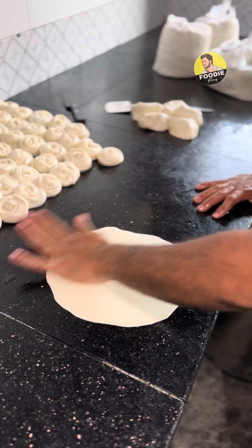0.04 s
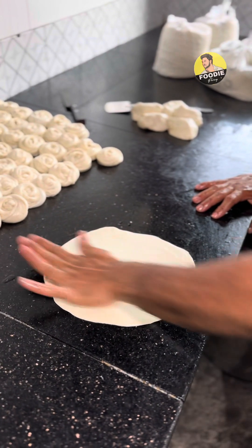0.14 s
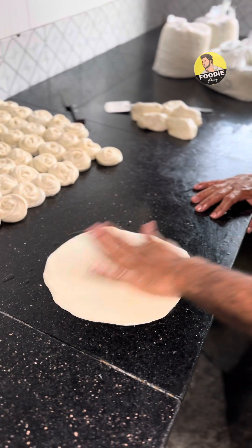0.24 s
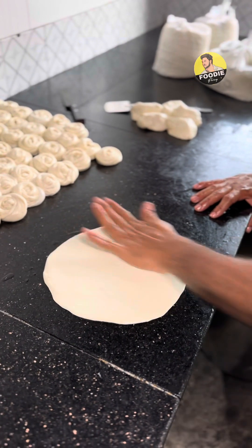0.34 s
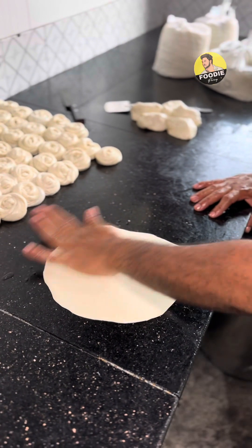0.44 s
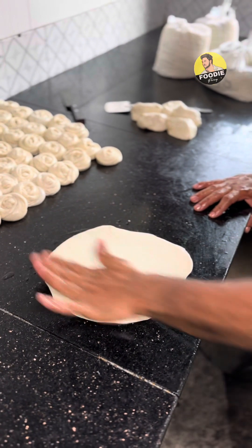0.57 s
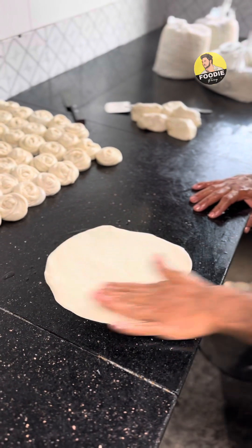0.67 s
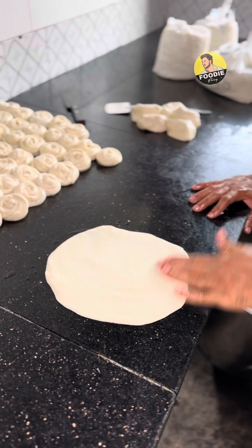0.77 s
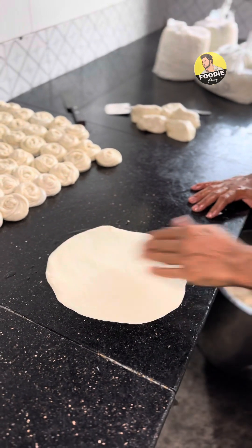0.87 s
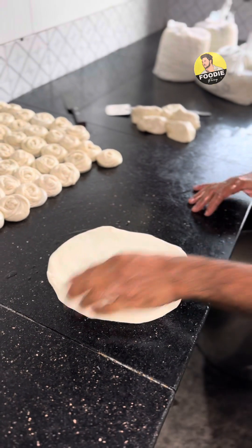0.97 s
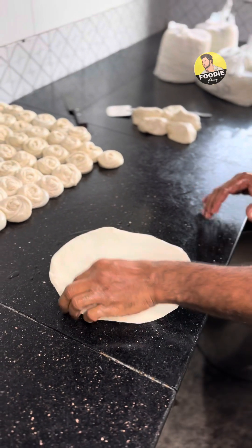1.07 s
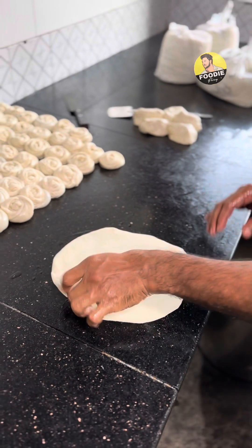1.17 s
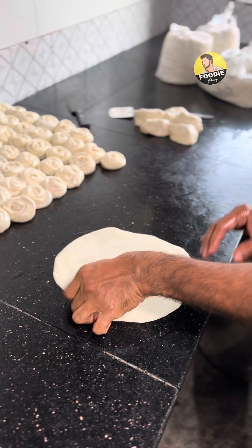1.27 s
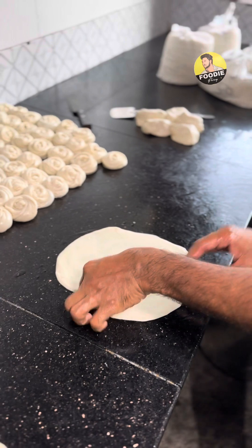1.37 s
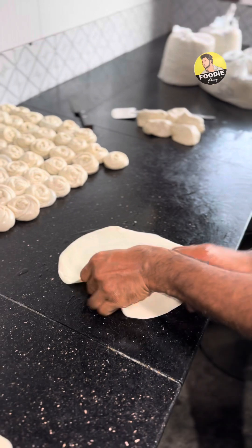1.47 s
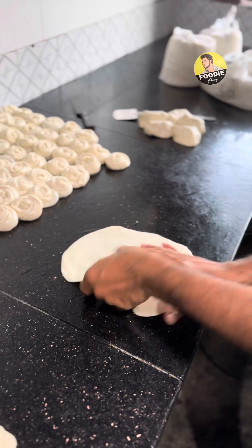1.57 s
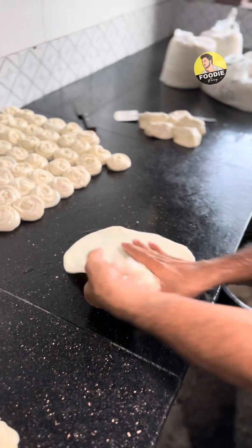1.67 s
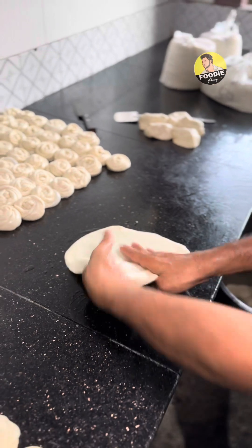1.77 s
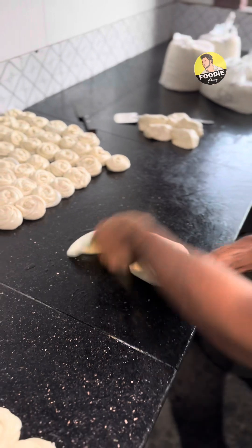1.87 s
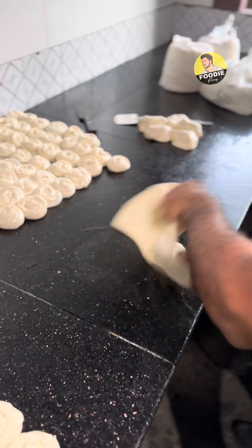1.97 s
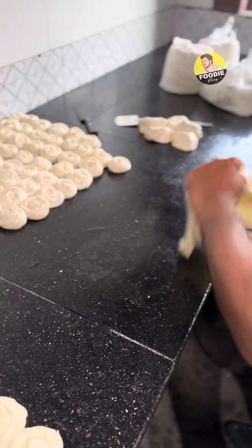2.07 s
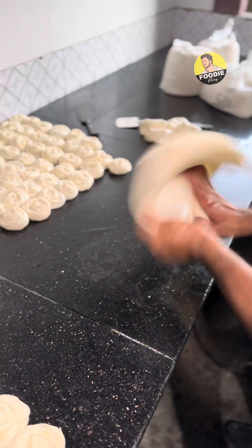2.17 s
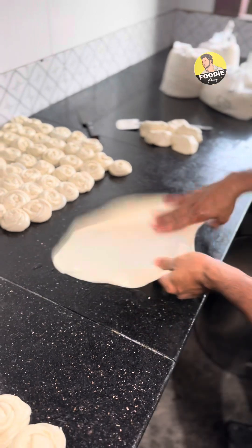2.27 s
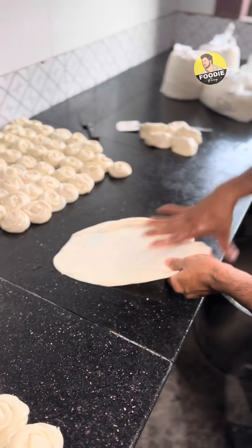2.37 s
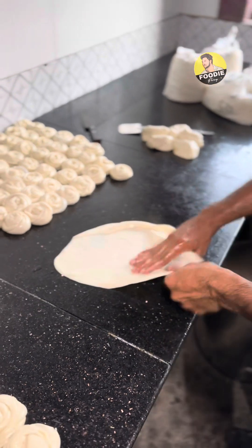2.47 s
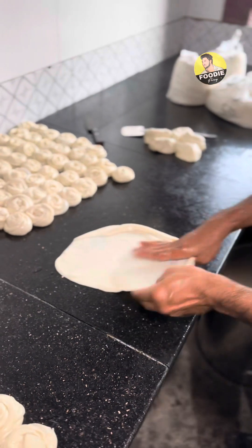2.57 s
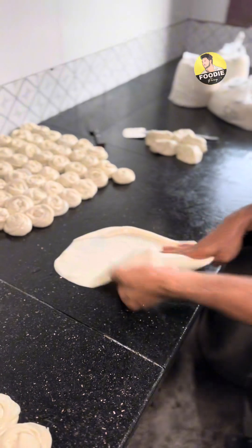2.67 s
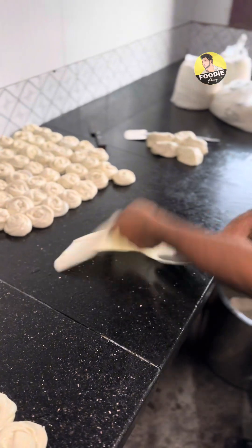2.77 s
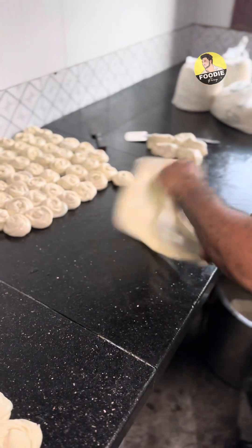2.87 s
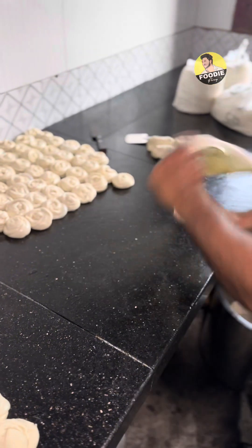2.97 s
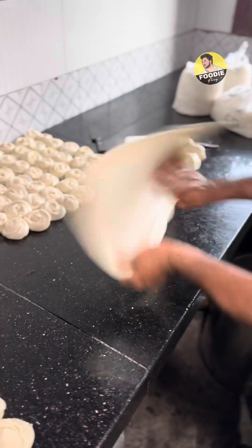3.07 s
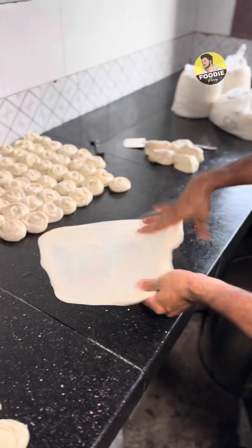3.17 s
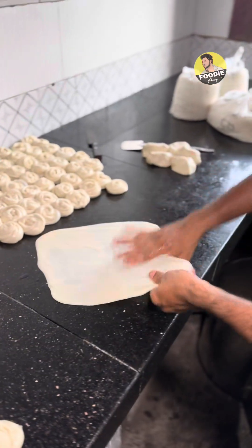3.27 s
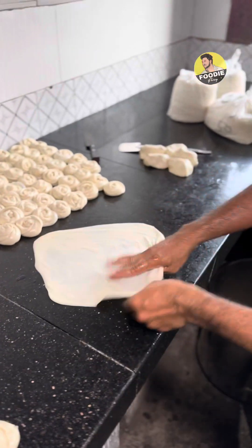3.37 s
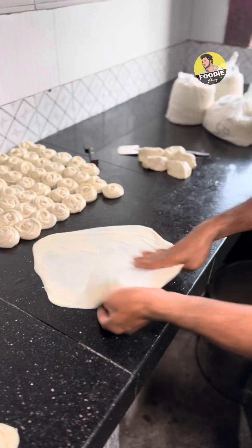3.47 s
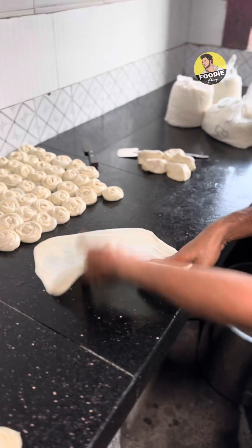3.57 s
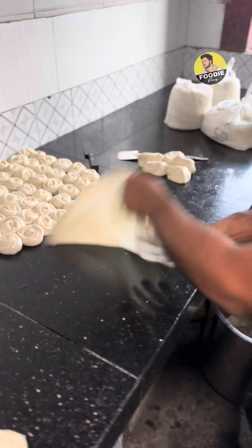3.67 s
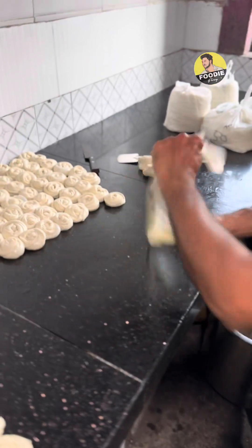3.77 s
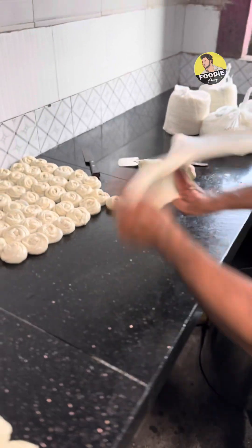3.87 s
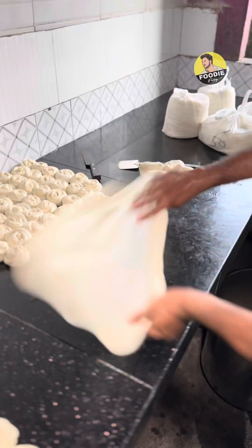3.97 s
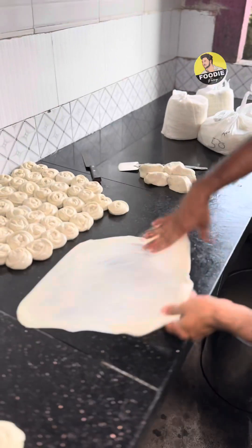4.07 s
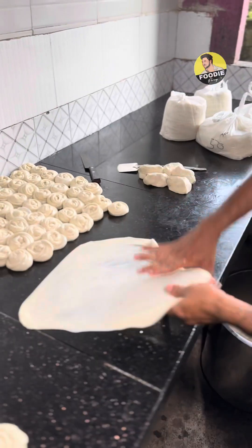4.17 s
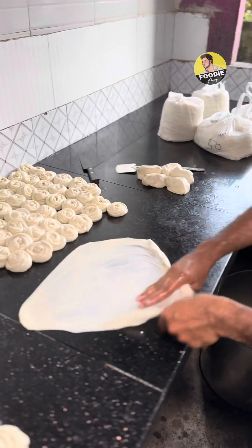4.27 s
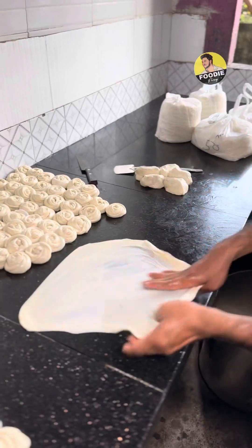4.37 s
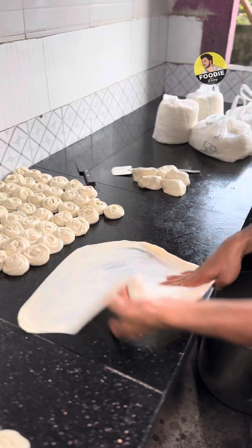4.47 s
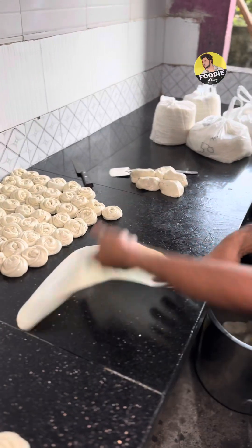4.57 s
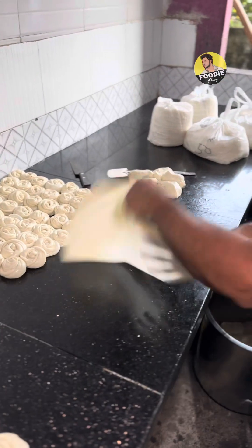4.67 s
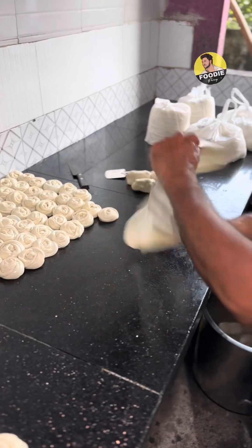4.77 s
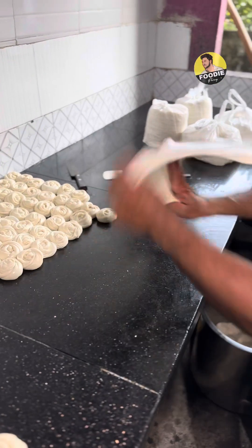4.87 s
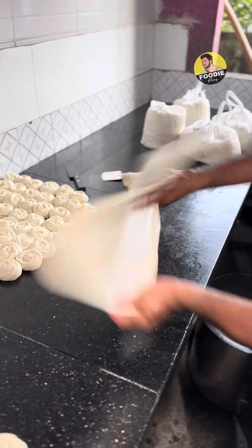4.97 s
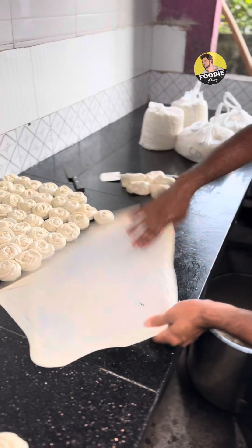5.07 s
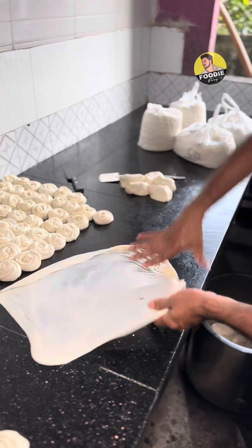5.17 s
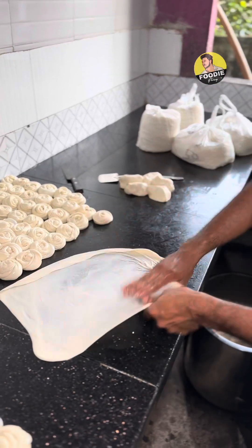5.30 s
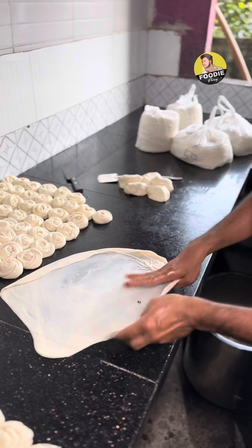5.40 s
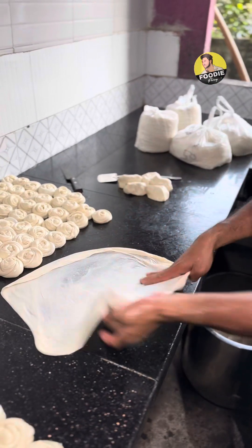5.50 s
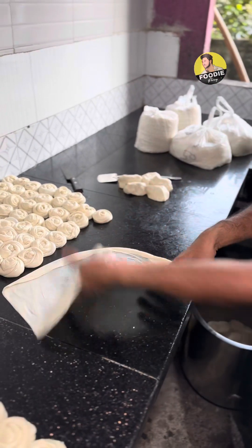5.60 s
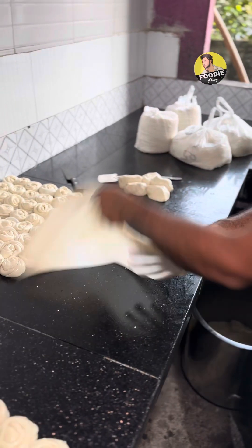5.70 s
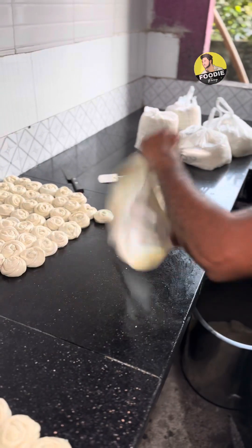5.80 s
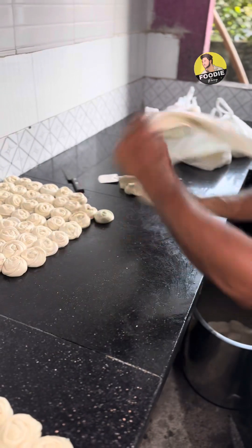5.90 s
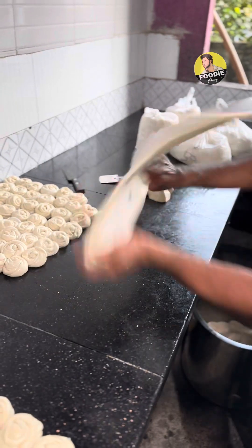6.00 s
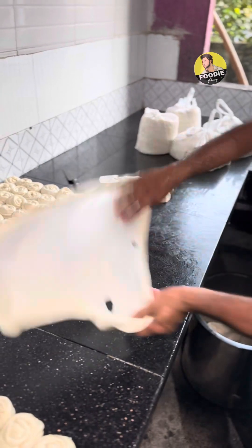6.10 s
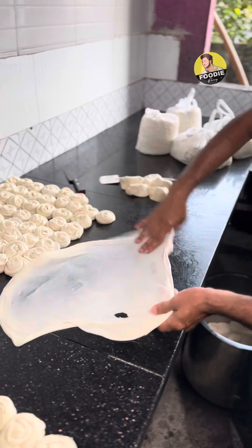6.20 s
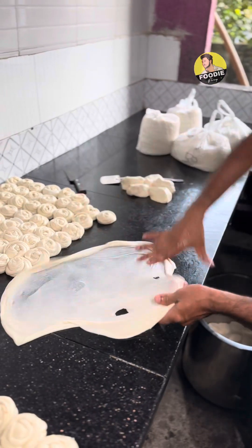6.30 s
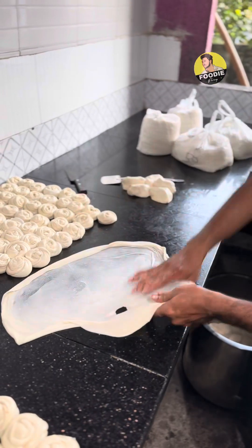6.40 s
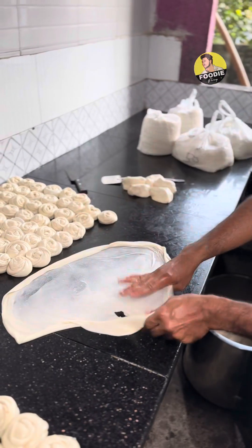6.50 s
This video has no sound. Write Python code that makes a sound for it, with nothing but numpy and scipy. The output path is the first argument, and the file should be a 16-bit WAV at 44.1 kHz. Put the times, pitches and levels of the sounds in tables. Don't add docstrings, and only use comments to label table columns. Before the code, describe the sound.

Thin dough sheets slap hard onto a stone counter at about one-second intervals, over a steady low fan and street hum in a tiled kitchen.

```python
import sys
import numpy as np
from scipy import signal
from scipy.fft import rfft, irfft
from scipy.io import wavfile
from scipy.ndimage import uniform_filter1d

SR = 44100
rng = np.random.default_rng(int(sys.argv[2]) if len(sys.argv) > 2 else 0)


def ratio(d):
    e = np.asarray(d, float) / 20
    return 10 ** e


def dump_mix(stems):
    frames = np.atleast_2d(stems).T
    limited = np.clip(frames, -1, 1)
    pcm = np.round(limited * 32767).astype(np.int16)
    wavfile.write(sys.argv[1], SR, pcm)


N = 288678
TIME = np.arange(N) / SR
FREQ = np.fft.rfftfreq(N, 1 / SR)

# time in seconds, level in dB.
STREET_SWELL = [(0.0, -36.5), (0.11, -40), (0.46, -42), (1.29, -42.5), (1.51, -38), (2.11, -40.5),
                (2.83, -41.5), (3.04, -44), (3.7, -49), (4.05, -43), (5.56, -45), (5.82, -44),
                (6.45, -42.5), (6.55, -43)]
STREET_MEAN_DB = -42.5
FOLLOW_STREET = (0.56, 0.035, 0.25, 0.0)
# centre in seconds, half width in seconds, lift in dB.
GUSTS = [(.2, 0.55, 10), (.85, .07, 10), (1.8, 0.42, 13), (2.8, 0.27, 8), (3.62, 0.18, 15), (4.1, 0.13, 5),
         (4.75, 0.37, 14), (5.62, 0.17, 11), (6.05, .2, 9)]
CALM_DB = -22.5
# frequency in Hz,
# density in dB per Hz.
HUM_MID = [(25, -15), (70, -2), (154, -11.5), (280, -15), (510, -26.5), (651, -24.5), (1780, -32),
           (2670, -31.5), (4300, -37), (5000, -43), (5800, -37.5), (9580, -45), (10300, -51),
           (13600, -68), (14700, -37), (15800, -43), (16100, -87)]
# frequency in Hz, density in dB per Hz.
HUM_SIDE = [(15, -50), (25, -23), (121, -14.5), (163, -21), (280, -6), (313, -9.5), (726, -2),
            (1830, -13.5), (2750, -4), (4480, -9), (5880, -23), (10700, -11), (14800, -6.5), (16500, -36)]
# centre in Hz, width in Hz, level in dB.
DRONES = [(67.7, 14.4, -46), (113.2, 8.7, -55.5), (211.2, 15, -50)]
# start in seconds, peak in dB, ring in Hz, ring T60 in seconds,
# click over ring in dB.
TAPS = [
    (0.331, -42, 2930, 0.038, -23),
    (0.52, -40, 770, 0.029, 0),
    (2.429, -45, 2600, 0.053, -2),
    (2.696, -42, 845, 0.046, -10),
    (3.557, -24.5, 860, 0.017, -8),
    (4.506, -35, 1040, 0.024, -6.5),
    (4.966, -30.5, 1510, 0.045, -6.5),
    (5.573, -39, 900, 0.043, -15),
    (5.661, -45, 900, 0.036, 9),
    (6.039, -27, 1450, 0.031, -12),
]
# start in seconds, peak in dB, ring in Hz,
# ring T60 in seconds, click over ring in dB.
SWISHES = [
    (3.104, -29, 2750, .09, -14),
    (3.115, -25, 2700, .05, -14),
    (3.982, -36, 2400, .05, -14),
    (6.209, -36, 2600, .04, 2),
    (6.227, -37, 1800, .04, 2),
]
# start in seconds, length in seconds, from Hz, to Hz, level in dB.
SQUEALS = [
    (.5, .25, 2620, 2620, -63),
    (4.3, .42, 2380, 2480, -60),
    (5.4, .67, 2770, 2860, -56.5),
    (6.2, .35, 2600, 2590, -62),
    (6.25, .3, 2330, 2330, -63),
]
# start in seconds, length in seconds, top pitch in Hz, level in dB,
# strong-weak pulsing from 0 to 1.
CAWS = [
    (2.122, .285, 562, -53, .083),
    (3.16, .28, 562, -54, .73),
]
# frequency in Hz, gain in dB.
THROAT = [(500, -28), (1050, -5), (1520, 2.5), (1700, -2), (1950, 5), (2260, 5), (2700, -17), (3300, -14)]
CAW_SAG, CAW_PEAK_AT, CAW_EDGE_S = .19, .25, .012
# start in seconds, peak in dB, pocket start in Hz, contact in ms, pitch fall in ms.
SLAPS = [
    (2.2372, -12.5, 2950, 2.68, 1.94),
    (3.1211, -9.5, 2623, 3.65, 2.6),
    (3.9913, -17.5, 2625, 2.87, 1.37),
    (4.0204, -28, 2970, 1, 20),
    (5.0149, -18.5, 1810, 3.5, 1.18),
    (5.0376, -8, 1475, 3.8, 2.44),
    (6.1122, -18, 1257, 5.4, 4.76),
]
CRACK_DB, CRACK_DB_PER_KHZ = -47.5, 14
RAGGED_DB, RAGGED_DB_PER_KHZ = -23, 8
# start in seconds, level in dB, centre in Hz.
THUMPS = [(2.244, -28.5, 302), (3.13, -19.5, 223), (3.994, -24.5, 193), (5.04, -28, 300),
          (6.115, -28.5, 366)]
# start in seconds, level in dB, fade in dB per second, dullness as
# 700-2200 Hz over the treble in dB.
FOLDS = [(2.25, -31, 230, -4.5), (3.128, -28, 900, -13), (3.136, -22.5, 450, 5.5), (3.165, -35, 192, 6.5),
         (3.24, -48.5, 28, 7), (3.997, -27, 800, -7), (4.017, -35.5, 240, -3), (5.045, -32.5, 330, 3),
         (5.085, -49, 120, -8), (6.118, -40, 106, 0), (6.158, -43, 300, -4), (6.18, -42.5, 400, -9),
         (6.202, -35.5, 400, -11), (6.222, -43, 550, -7)]
FOLD_ATTACK_S, FOLD_LASTS_S = 0.0024, 0.12
# centre in seconds, pitch in Hz, level in dB, half width in ms.
CHIRPS = [(3.083, 6500, -51, 25), (3.36, 7200, -51.5, 30), (3.41, 7570, -48.5, 22), (3.503, 6820, -52, 14),
          (3.557, 6700, -51, 12), (3.93, 8000, -52, 15), (2.88, 8000, -54, 15)]
# frequency in Hz, radians by which the left leads.
PORT_LEAD = [(0, 0), (300, -.1), (1980, -.3), (2500, -1.7), (4310, -2.0), (4800, -2.6), (5680, -.5),
             (7240, -.2), (8500, -1.3), (9900, -3.05), (13500, -3.14), (14800, -4.0), (17000, -4.2)]
# frequency in Hz, share from 0 to 1.
PORT_APART = [(250, 0), (600, .8), (3000, 1), (8000, .7), (9800, 0)]
# frequency in Hz, T60 in seconds.
ROOM_T60 = [(200, 0.81), (800, 0.23), (2500, 0.31), (6000, 0.26), (12000, 0.19)]
# delay in seconds, level in dB.
ECHOES = [(.0095, -17), (0.0125, -14.5), (.021, -25)]


def unit(x):
    return x / np.sqrt(np.mean(x ** 2))


def shape(table, hz):
    f, v = np.transpose(table)
    return np.interp(np.log(hz + 1), np.log(f + 1), v)


def band(x, lo_hz, hi_hz):
    return signal.sosfilt(signal.butter(2, [lo_hz, hi_hz], "bandpass", fs=SR, output="sos"), x)


def smooth(x, first, second):
    return uniform_filter1d(uniform_filter1d(x, first), second)


def walk(rate):
    k = int(SR / rate)
    held = np.repeat(rng.standard_normal(N // k + 1), k)
    return 1.32 * smooth(held, k, k)[:N]


def decay(t, t60):
    return np.exp(-np.log(1000) * t / t60)


def tone(hz):
    return np.sin(2 * np.pi * np.cumsum(hz) / SR)


def add(out, s, x):
    i = int(s * SR)
    out[i:i + len(x)] += x[:N - i]


def ports(left, other, direct=0):
    f, lead = np.transpose(PORT_LEAD)
    turn = np.exp(.5j * (np.interp(FREQ, f, lead) + direct * (FREQ > 9800)))
    share = shape(PORT_APART, FREQ)
    a, b = rfft(left), rfft(other)
    mixed = a + share * (b - a)
    return np.array([irfft(a * turn, N), irfft(mixed / turn, N)])


def traffic_db():
    return np.interp(TIME, *np.transpose(STREET_SWELL)) - STREET_MEAN_DB


def hum(side_db=-26):
    swells = np.outer(FOLLOW_STREET, traffic_db())
    swells[-1] += CALM_DB
    for s, width, db in GUSTS:
        swells[-1] += db * np.exp(-((TIME - s) / width) ** 2)
    air = rfft(rng.standard_normal(N))
    f, lead = np.transpose(PORT_LEAD)
    lag = 1j * np.sign(np.sin(np.interp(FREQ, f, lead)))
    mid = air * ratio(shape(HUM_MID, FREQ))
    side = lag * air * ratio(shape(HUM_SIDE, FREQ) + side_db)
    pair = np.array([mid + side, mid - side]) / np.std(irfft(mid, N))
    out = 0
    for octave in np.arange(4, 14.5, .5):
        window = np.clip(1 - 2 * np.abs(np.log2(FREQ + 1) - octave), 0, 1)
        layer = np.searchsorted([7.2, 12.2, 13.2], octave)
        flicker_db = (1.7, 1.66, 0.93, 0.68)[layer] * walk(9) + 0.29 * walk(2.37)
        flicker_db += 4.5 * (octave > 13.4) * walk(16)
        out = out + ratio(swells[layer] + flicker_db) * irfft(pair * window, N)
    return ratio(-37.0) * out


def drones():
    out, street_db = np.zeros((2, N)), traffic_db()
    for hz, width, db in DRONES:
        noise = unit(band(rng.standard_normal((2, N)), hz - width / 2, hz + width / 2))
        out += ratio(db + 1.6 * walk(6.8) + street_db * (hz < 100)) * noise
    return ports(*out)


def taps():
    out, t = np.zeros(N), TIME[:4096]
    for s, db, hz, t60, click_db in TAPS + SWISHES:
        noise = rng.standard_normal((2, len(t)))
        breath = unit(band(noise[0], 0.85 * hz, 1.64 * hz))
        ring = (1.36 * np.sin(2 * np.pi * hz * t) + 0.54 * breath) * decay(t, t60)
        click = unit(band(noise[1], 1250, 4900)) * np.exp(-t / 0.0059)
        attack = np.minimum(t / 0.0014, 1)
        add(out, s - .001, ratio(db) * attack * (ring + ratio(click_db) * click))
    return out


def squeals(waver=.008, flutter_db=1):
    out = np.zeros(N)
    for s, length, from_hz, to_hz, db in SQUEALS:
        u = np.clip((TIME - s) / length, 0, 1)
        hz = (from_hz + (to_hz - from_hz) * u) * (1 + waver * walk(120))
        swell = np.abs(np.sin(np.pi * u)) ** 0.3 * (u < 1)
        out += ratio(db + flutter_db * walk(14)) * (1.4 + 0.52 * walk(70)) * swell * tone(hz)
    return out


def crow(rough=0.016, rasp=.5):
    out = np.zeros(N)
    for s, length, top_hz, db, doubling in CAWS:
        u = np.clip((TIME - s) / length, 0, 1)
        scoop = np.clip(1 - u / CAW_PEAK_AT, 0, 1) ** 1.3
        droop = np.clip((u - CAW_PEAK_AT) / (1 - CAW_PEAK_AT), 0, 1) ** 2.6
        hz = top_hz * (1 - CAW_SAG * (scoop + droop))
        phase = 2 * np.pi * np.cumsum(hz * (1 + rough * walk(90))) / SR
        stack = 0
        for k in range(1, 7):
            stack = stack + ratio(shape(THROAT, k * hz) + 2.7 * walk(30.23)) * np.sin(k * phase)
        edges = np.minimum(np.minimum(u, 1 - u) * length / CAW_EDGE_S, 1)
        pulses = 1 + rasp * walk(150) + doubling * np.cos(phase / 2)
        out += ratio(db) * edges * stack * pulses
    return out


def slaps():
    out, t = np.zeros(N), TIME[:2048]
    for s, db, hz, contact_ms, fall_ms in SLAPS:
        noise = rng.standard_normal((4, len(t)))
        rise = t / (contact_ms * 4.5e-4)
        swell = rise * np.exp(1 - rise)
        pitch = 300 + (hz - 300) * np.exp(-t / (fall_ms * 1e-3))
        wobble = .6 * unit(smooth(noise[0], 12, 16))
        pocket = np.sin(2 * np.pi * np.cumsum(pitch) / SR + wobble) * swell ** 0.82
        ragged = swell * unit(band(noise[3], 1560, 3430))
        ragged *= ratio(RAGGED_DB + RAGGED_DB_PER_KHZ * hz / 1e3)
        crack = unit(band(noise[1], 5790, 6590)) + ratio(5.5) * unit(band(noise[2], 2100, 16200))
        crack *= swell * ratio(CRACK_DB + CRACK_DB_PER_KHZ * hz / 1e3)
        add(out, s, ratio(db) * (pocket + ragged + crack))
    return out


def thumps(t60=0.11):
    out, t = np.zeros(N), TIME[:8192]
    for s, db, hz in THUMPS:
        boom = unit(band(rng.standard_normal(len(t)), 0.52 * hz, 1.48 * hz))
        add(out, s, ratio(db) * np.minimum(t / 0.0011, 1) * decay(t, t60) * boom)
    return out


def settle(spread_db=0.4, rate=8000):
    power = np.zeros((2, N))
    for s, db, fade_db, dull_db in FOLDS:
        t = np.clip(TIME - s, 0, 1)
        fold = ratio(db - fade_db * t) * np.minimum(t / FOLD_ATTACK_S, 1)
        fold *= np.clip((FOLD_LASTS_S - t) / 0.036, 0, 1)
        power += (fold * np.array([[1], [ratio(dull_db)]])) ** 2
    gain = np.sqrt(power)
    happens = rng.random(N) < rate / SR
    pops = happens * rng.standard_normal(N) * ratio(spread_db * rng.exponential(size=N))
    sides = []
    for share in (0, .9):
        x = unit(pops) + share * rng.standard_normal(N)
        bright = unit(band(x, 1660, 5330))
        bright += ratio(-3.5) * unit(band(x, 6200, 10200))
        bright += ratio(-10.5) * unit(band(x, 9000, 14400))
        dull = unit(band(x, 705, 1060)) + ratio(-2) * unit(band(x, 1290, 2200))
        sides.append(ratio(5.0) * gain[0] * bright + gain[1] * dull)
    return ports(*sides)


def chirps():
    out = np.zeros(N)
    for s, hz, db, ms in CHIRPS:
        t = np.arange(-.08, .08, 1 / SR) / (ms * 1e-3)
        wobble = 0.95 * unit(uniform_filter1d(rng.standard_normal(len(t)), size=90))
        phase = 2 * np.pi * np.cumsum(hz * (1 - .012 * t)) / SR + wobble
        add(out, s - .08, ratio(db) * np.exp(-t ** 2) * np.sin(phase))
    return out


def room(x):
    t = TIME[:SR // 2]
    noise = rng.standard_normal((2, len(t)))
    noise[1] = 0.52 * noise[0] + 1.13 * noise[1]
    tail = 0
    for hz in 180 * 2. ** np.arange(7):
        octave = band(noise, hz / 2 ** .5, hz * 2 ** .5)
        tail = tail + min(hz / 700, 1) * octave * decay(t, shape(ROOM_T60, hz))
    tail = ratio(-30) * tail * np.minimum(t / 0.0007, 1)
    for delay, db in ECHOES:
        tail[:, int(delay * SR)] += ratio(db)
    return ports(*signal.fftconvolve(tail, x[None])[:, :N])


def scene():
    near = taps() + slaps() + thumps()
    outside = squeals() + crow() + chirps()
    direct = ports(near + outside, near + outside, direct=0.4)
    return direct + room(near + ratio(6.5) * outside) + settle() + hum() + drones()


def band_limit(x):
    return signal.sosfilt(signal.butter(12, 16990, fs=SR, output="sos"), x)


def record(dry):
    rounded = np.tanh(0.88 * dry) / 0.92
    low_pass = signal.ellip(8, .2, 70, 16000, fs=SR, output="sos")
    mix = signal.sosfilt(low_pass, rounded)
    return band_limit(mix)


dry = scene()
out = record(dry)
dump_mix(out)
```